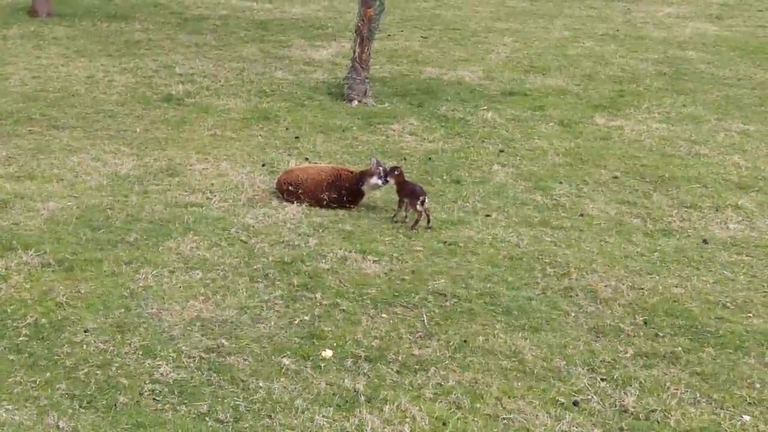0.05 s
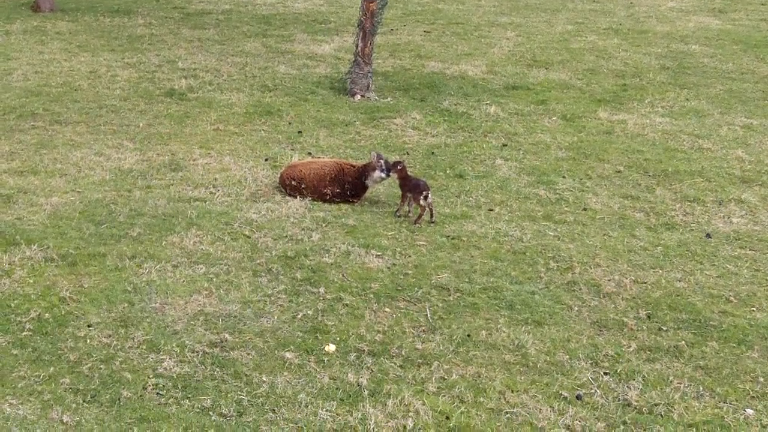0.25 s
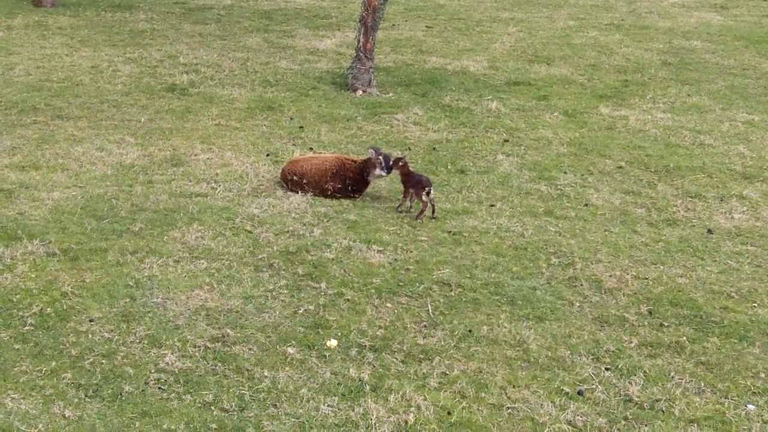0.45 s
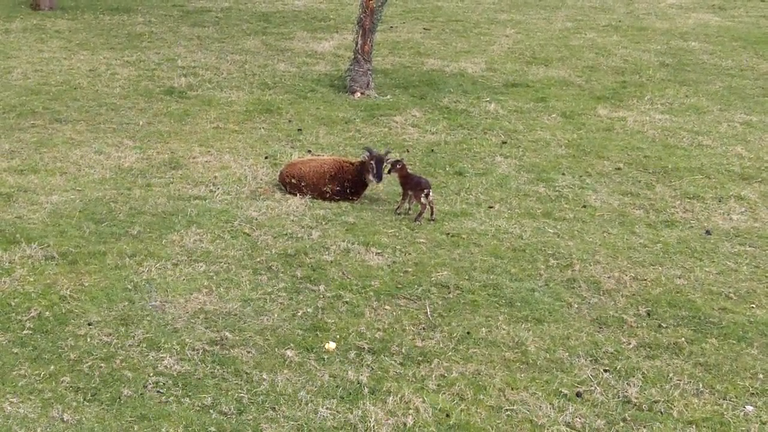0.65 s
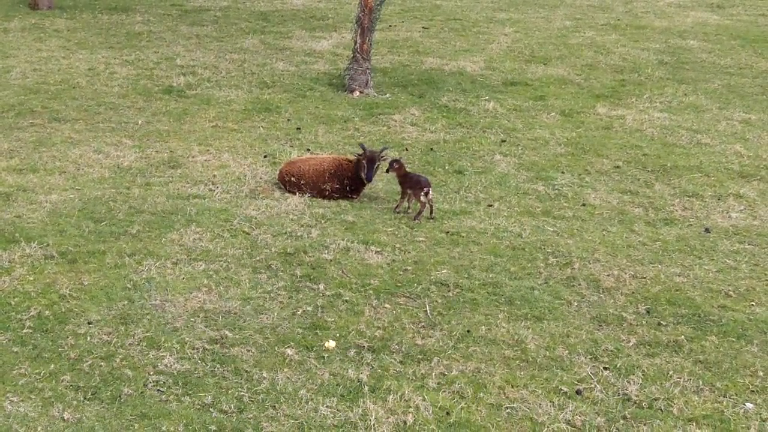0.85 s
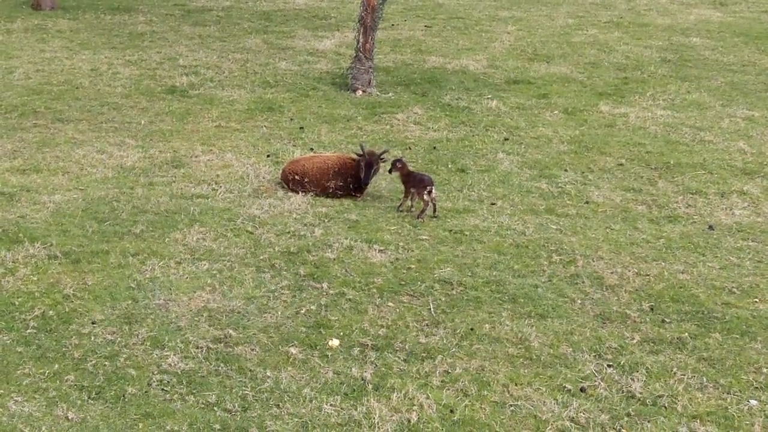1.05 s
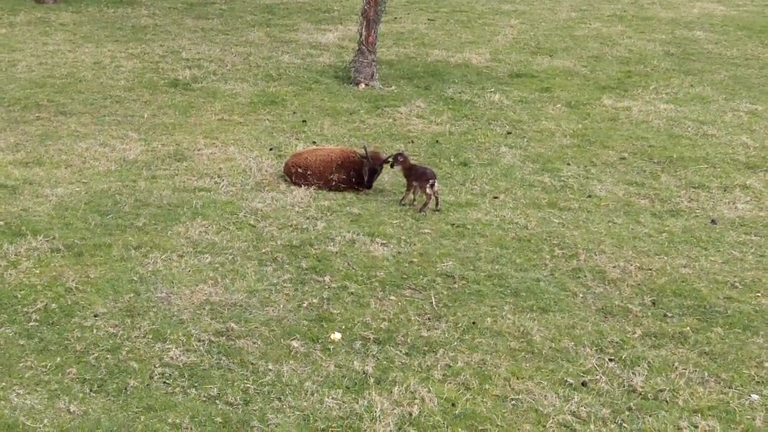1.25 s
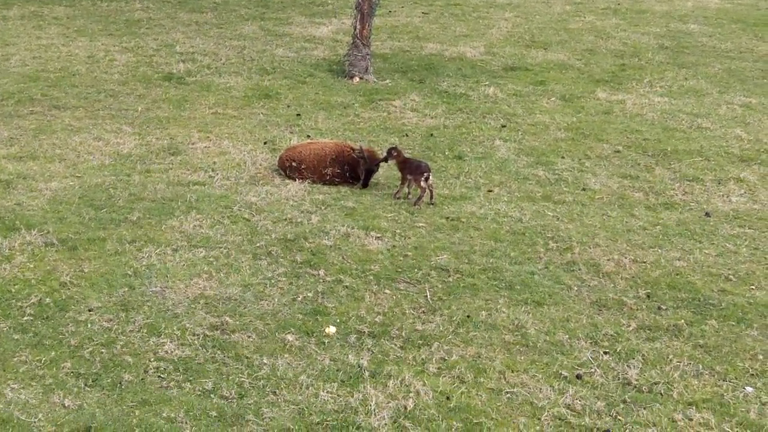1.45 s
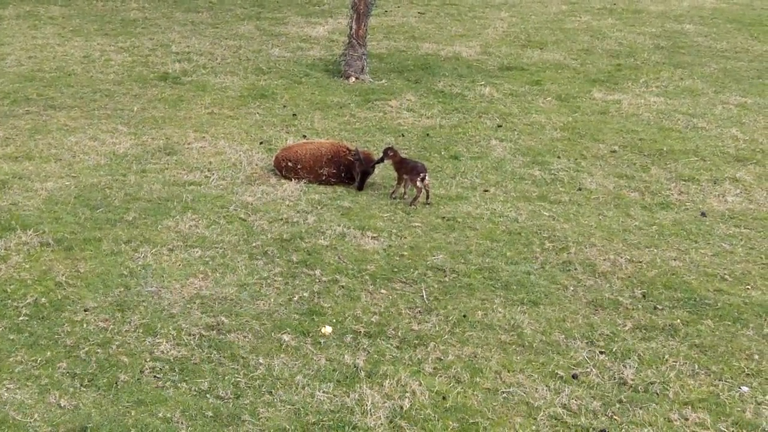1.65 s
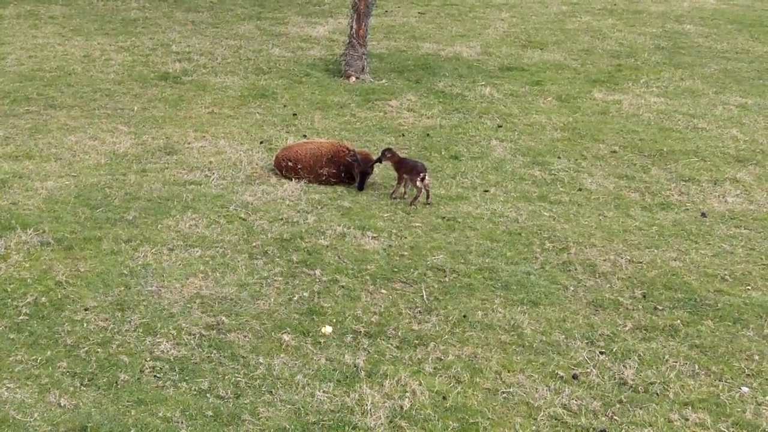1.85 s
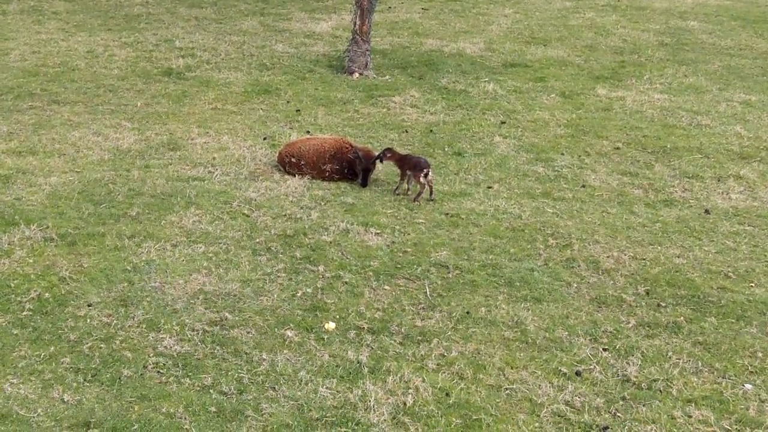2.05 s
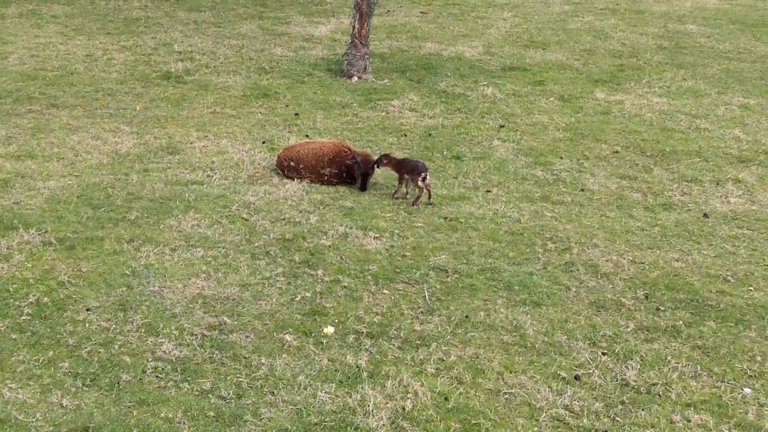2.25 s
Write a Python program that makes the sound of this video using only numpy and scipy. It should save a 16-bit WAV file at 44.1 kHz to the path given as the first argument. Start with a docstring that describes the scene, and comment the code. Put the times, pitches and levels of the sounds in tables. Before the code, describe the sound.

A dog whines close by in three short, thin, falling whimpers over a quiet meadow

```python
"""A dog whines three times close to a camera in a meadow, after the tail of an earlier whine: a near-pure,
mostly falling voice and a thin nasal whistle are two oscillators, with their difference tone between them.
Shaped noise makes the hiss of nose air and grass, a huff, a scuff and the hum of the land; short decaying
bursts make ticks and snaps, slow pulses soft thumps on the microphone. A lamb bleats far off in a few
harmonics, and the camera's electronics sing a steady high tone."""
import sys
import numpy as np
from scipy import signal
from scipy.fft import rfft, irfft, next_fast_len
from scipy.io import wavfile
from scipy.ndimage import uniform_filter1d, map_coordinates

SR = 44100
rng = np.random.default_rng(int(sys.argv[2]) if len(sys.argv) > 2 else 0)


def unload_audio(sound):
    """Save the sound as a 16-bit wav file, at the path given as the first command line argument."""
    columns = np.transpose(np.atleast_2d(sound))
    # keep every value between -1 and 1, then stretch to whole-number steps
    steps = np.round(np.clip(columns, -1, 1) * 32767)
    wavfile.write(sys.argv[1], SR, steps.astype(np.int16))


def volts_from_decibels(level):
    """Turn decibel levels (scalar or array-like) into linear amplitude factors."""
    exponent = np.asarray(level, float) / 20
    return 10 ** exponent


N = 101429
T = np.arange(N) / SR  # time in seconds


def unit(x):
    """Scale to rms 1."""
    return x / np.sqrt(np.mean(x ** 2) + 1e-20)


def along(points, hz):
    """Read (Hz, value) points on a logarithmic frequency axis."""
    f, v = np.transpose(points)
    return np.interp(np.log(hz + 1), np.log(f + 1), v)


def track(tables, column):
    """One column of joined tables, a value per sample."""
    rows = np.concatenate(tables)
    return np.interp(T, rows[:, 0], rows[:, column])


def level(tables, column):
    """Gain from a dB column, fading to silence within 6 ms outside each table."""
    total = np.zeros(N)
    for rows in map(np.asarray, tables):
        inside = np.minimum(T - rows[0, 0], rows[-1, 0] - T)  # seconds from the nearer end
        edge = np.clip(1 + inside / .006, 0, 1)
        gain = volts_from_decibels(np.interp(T, rows[:, 0], rows[:, column]))
        total = np.maximum(total, gain * edge)
    return uniform_filter1d(total, size=90)


def wobble(rate):
    """A smooth random curve, rate knots a second."""
    return map_coordinates(rng.standard_normal(1200), [T * rate])


def filtered(x, response):
    """x times a response given as a function of frequency."""
    m = next_fast_len(N + 8192)
    return irfft(rfft(x, m) * response(np.fft.rfftfreq(m, 1 / SR)), m)[..., :N]


def coloured(x, spectrum):
    """x in the colour of the spectrum, rms 1."""
    return unit(filtered(x, lambda hz: volts_from_decibels(along(spectrum, hz))))


def resonant(x, peaks):
    """x through parallel band resonances of alternating sign, rms 1."""
    def response(f):
        total = 0
        for k, (centre, width, db) in enumerate(peaks):
            damping = 1j * f * width
            total = total + (-1) ** k * volts_from_decibels(db) * damping / (centre * centre - f * f + damping)
        return total
    return unit(filtered(x, response))


def phase(hz):
    """Running phase of a frequency curve."""
    return 2 * np.pi * np.cumsum(hz) / SR


def dog_whine():
    """Voice and whistle oscillate apart; a tone at their difference frequency has its own level."""
    # The voice. Each row: time in seconds, pitch in Hz, level in dB of the 1st, 2nd and 3rd harmonic.
    earlier_tail = [(0, 895, -32, -66, -74), (.012, 760, -51, -69.5, -75.5), (.03, 815, -61, -80.5, -88)]
    whine_rows = [
        [(0.222, 1161, -51.5, -73, -76.5), (0.232, 1137, -41.5, -76.5, -95), (0.24, 1155, -21.5, -48.5, -71),
         (0.248, 1191, -18, -41.5, -56.5), (0.278, 1176, -18, -41, -55), (0.294, 1130, -18.5, -42, -60.5),
         (0.312, 1036, -24, -50.5, -56), (0.32, 973.5, -22, -50, -59), (0.326, 886, -28.5, -53, -81.5),
         (0.33, 814, -32.5, -57, -68), (0.335, 783, -29.5, -58, -70)],
        [(0.337, 768, -27.5, -60, -78.5), (0.345, 749.7, -19, -61, -60), (0.357, 743, -22, -47.5, -71.5),
         (0.367, 744.6, -23, -57, -87.5), (0.405, 698, -27, -57, -68), (0.415, 701.4, -27.5, -61, -80),
         (0.427, 682.4, -29.5, -65, -70), (0.433, 698.5, -31, -82, -86), (0.435, 689, -32.5, -64, -70),
         (0.443, 653.7, -31.5, -52, -72), (0.465, 704.6, -56, -68, -75)],
        [(1.18, 800, -58, -69, -74), (1.19, 822, -32, -67, -74), (1.198, 822, -27, -64, -68),
         (1.21, 815, -27, -55, -70), (1.22, 735, -28.5, -48, -54), (1.232, 699, -31, -61, -54),
         (1.246, 670, -34, -65, -60), (1.26, 651.6, -31.5, -55, -54), (1.28, 620, -36.5, -73, -76),
         (1.284, 614, -44, -46, -76), (1.295, 630, -52, -74, -57)],
        [(1.748, 1265, -50, -60, -78), (1.753, 1276, -33.5, -49, -76), (1.765, 1284, -33, -43, -64),
         (1.792, 1270, -34, -41, -58), (1.803, 1251, -41, -43.5, -58), (1.81, 1244, -60, -46, -55),
         (1.815, 1232, -47, -62, -48), (1.821, 1200, -34, -43, -56), (1.826, 1171, -46.5, -40, -66),
         (1.83, 1155, -31, -40, -66), (1.838, 1135, -26, -43.5, -64), (1.85, 1080, -30, -44, -68),
         (1.857, 1058, -31, -66, -74), (1.869, 985, -23, -58, -66), (1.874, 920, -18, -52, -45),
         (1.88, 880, -17.5, -48, -46), (1.884, 805, -17, -38, -60), (1.889, 763, -21, -39, -53),
         (1.902, 752.5, -22, -38, -52), (1.932, 719, -27, -48, -66), (1.942, 731, -28, -63, -58),
         (1.946, 762.5, -28, -64, -72), (1.958, 750, -29.5, -41.5, -66), (1.982, 734.7, -31, -46, -55.5),
         (2.036, 723, -29.5, -45, -70), (2.044, 697, -30, -43, -65), (2.07, 701, -35.5, -55, -59),
         (2.076, 696, -32.5, -67, -75), (2.092, 665, -46, -78, -76)],
    ]
    # The nasal whistle in three stretches. Each row: time in seconds, frequency in Hz, level in dB.
    whistle_start = [(0.0, 7440, -50.5), (0.026, 7264, -50.5), (0.056, 7165, -42.5), (0.08, 7211, -58),
                     (0.124, 6920, -68.5), (0.132, 6780, -64), (0.198, 6930, -55), (0.24, 6760, -65.5),
                     (0.26, 6790, -78.5)]
    whistle_middle = [(.262, 6800, -77.5), (.31, 6800, -73), (.322, 6750, -57), (0.344, 6330, -66),
                      (.36, 6080, -62.5), (.386, 5770, -68), (.392, 6040, -56), (.4, 6030, -48.5),
                      (.418, 6054, -45), (.44, 6100, -60), (0.459, 6170, -44), (.472, 5850, -67),
                      (.51, 6160, -75)]
    whistle_end = [(0.741, 7000, -78), (0.758, 7000, -60), (.775, 7130, -60), (.795, 7270, -72),
                   (0.811, 7060, -68), (.838, 7025, -63), (.87, 7100, -77), (.95, 7100, -71),
                   (0.991, 7000, -67), (1.04, 6740, -57), (1.052, 6470, -77), (1.075, 6530, -64),
                   (1.111, 6270, -72), (1.151, 6340, -71), (1.18, 6320, -58), (1.22, 6250, -74)]
    # The difference tone, whistle minus voice. Each row: time in seconds, level in dB.
    beat_rows = [(.23, -79), (.245, -63), (.29, -65.5), (.34, -72), (.36, -73), (.41, -70), (.44, -52.5),
                 (.455, -60), (.47, -85)]
    jitter = .001  # random share of the frequency
    shimmer_db, overtone_shimmer_db = .2, 1.3  # overtones flicker more
    fourth_db, octave_db = -11, -35  # 4th harmonic under the 3rd; the whistle's overtone

    voice = [earlier_tail, *whine_rows]
    pipe = [whistle_start, whistle_middle, whistle_end]
    voice_hz = uniform_filter1d(track(voice, column=1), size=200)
    pipe_hz = uniform_filter1d(track(pipe, column=1), size=200)
    low = phase(voice_hz * (1 + jitter * wobble(120)))
    high = phase(pipe_hz * (1 + jitter * wobble(48)))

    first = np.sin(low) * volts_from_decibels(shimmer_db * wobble(90))
    second = np.sin(2 * low) * volts_from_decibels(overtone_shimmer_db * wobble(60))
    upper = np.sin(3 * low) + volts_from_decibels(fourth_db) * np.sin(4 * low)
    upper = upper * volts_from_decibels(overtone_shimmer_db * wobble(60))
    whistle = np.sin(high) + volts_from_decibels(octave_db) * np.sin(2 * high)

    sound = level(voice, column=2) * first
    sound += level(voice, column=3) * second
    sound += level(voice, column=4) * upper
    sound += level(pipe, column=2) * whistle
    sound += level([beat_rows], column=1) * np.sin(high - low)
    return np.sqrt(2) * sound


def echo(x):
    """Trees and walls answer late, as noise in which each frequency dies at its own speed."""
    # Each row: frequency in Hz, time in seconds to fall by 60 dB.
    decay_times = [(500, 1.1), (1300, 1.0), (6000, .4)]
    delay_s = .025
    hz, t, z = signal.stft(rng.standard_normal(SR), SR, nperseg=256)
    decay = volts_from_decibels(-60 * t / along(decay_times, hz)[:, None])
    tail = signal.istft(z * decay, SR, nperseg=256)[1]
    late = np.pad(x, (round(delay_s * SR), 0))
    return signal.fftconvolve(late, tail / np.linalg.norm(tail))[:N]


def surroundings(dog):
    """The meadow answers the dog more or less strongly as it turns."""
    # Each row: time in seconds, level in dB of what is sent to the echo.
    send_rows = [(0, -33.5), (1.0, -38), (1.7, -3), (1.83, -16.5), (1.9, -29.5), (2.3, -9)]
    return echo(level([send_rows], column=1) * dog)


def land_hum():
    """Far hum: coloured noise whose strength varies in patches of time and frequency."""
    # Each row: time in seconds, level in dB.
    hum_levels = [(0, -46.5), (.4, -48), (.8, -50), (1.1, -51), (1.5, -51), (1.9, -48), (2.3, -52)]
    # Each row: frequency in Hz, relative level in dB per Hz.
    hum_colour = [(40, -58), (120, -25), (250, -10.5), (430, -6), (700, -2.5), (1200, -1.5), (1900, -6.5),
                  (2700, -14.5), (5000, -22.5), (8600, -28), (15500, -39), (16000, -60)]
    patch_db = 1.1  # rms depth of the patches
    z = signal.stft(rng.standard_normal(N), nperseg=512)[2]
    field = uniform_filter1d(rng.standard_normal(z.shape), size=6, axis=0)  # across frequency
    field = uniform_filter1d(field, size=12, axis=1)  # across time
    noise = signal.istft(z * volts_from_decibels(patch_db * unit(field)), nperseg=512)[1][:N]
    return level([hum_levels], column=1) * coloured(noise, hum_colour)


def rumble():
    """Low coloured noise under the hum."""
    # Each row: time in seconds, level in dB.
    rumble_levels = [(0, -58.5), (.45, -66), (.9, -67.5), (1.3, -64), (1.7, -71.5), (2.3, -69.5)]
    # Each row: frequency in Hz, relative level in dB per Hz.
    rumble_colour = [(15, -39), (30, -2.5), (90, -6.5), (200, -2.5), (310, -6.5), (365, 11.5), (430, -33.5),
                     (700, -37)]
    return level([rumble_levels], column=1) * coloured(rng.standard_normal(N), rumble_colour)


def camera_tone():
    """The electronics' steady tone, whose sign flips with every picture field."""
    tone_hz, tone_db = 7867.2, -56.5
    flips_per_s, first_flip_s, flip_s = 59.94, .0058, .00059  # flip_s: time constant of one flip
    swing = np.sin(np.pi * flips_per_s * (T - first_flip_s))
    sign = np.tanh(swing / (np.pi * flips_per_s * flip_s))
    return np.sqrt(2) * volts_from_decibels(tone_db) * sign * np.sin(2 * np.pi * tone_hz * T)


def side_hiss():
    """A faint steady coloured hiss, for use in opposite sign left and right."""
    # Each row: frequency in Hz, relative level in dB per Hz.
    side_colour = [(100, -51.5), (300, -11), (1000, -13), (2500, -11), (6000, -12.5), (10000, -16.5),
                   (15500, -12)]
    return volts_from_decibels(-72.5) * coloured(rng.standard_normal(N), side_colour)


def rustle():
    """Nose air and grass: smooth noise with random crackling grains, in one shared colour."""
    # One list of rows. Each row: time in seconds, level in dB before the lift below.
    hiss_rows = [
        [(.1, -88.5), (.16, -74), (.22, -77), (.43, -86), (.6, -86), (.67, -70), (.76, -84), (.79, -60),
         (.84, -66), (.88, -68.5), (.97, -70.5), (1.04, -63), (1.08, -69.5), (1.18, -73), (1.24, -60),
         (1.295, -59), (1.31, -80), (1.4, -67.5), (1.5, -65.5), (1.6, -69.5), (1.66, -62), (1.84, -58),
         (2.0, -59), (2.12, -61.5), (2.18, -69)],
    ]
    # Each row: frequency in Hz, relative level in dB per Hz.
    hiss_colour = [(1760, -21), (3000, -2), (3170, -4), (4060, -3), (7280, -4), (8070, -8), (8580, -8.5),
                   (14700, -21.5), (15500, -32.5)]
    lift_db, flutter_db = 5, 1.4
    grains_per_s, grain_db, grain_spread_db = 900, -5, 3  # grain_db: grains against the smooth noise
    chance, size = rng.random((2, N))
    grains = (chance < grains_per_s / SR) * rng.standard_normal(N)
    grains = grains * volts_from_decibels(-grain_spread_db * np.log(size + 0.00091))  # a few grains stand far out
    mix = rng.standard_normal(N) + volts_from_decibels(grain_db) * unit(grains)
    flutter = volts_from_decibels(lift_db + flutter_db * wobble(70))
    return flutter * level(hiss_rows, column=1) * coloured(mix, hiss_colour)


def grass_snaps():
    """Duller snaps: a very short contact rings the resonances of a stalk."""
    # Each row: start in seconds, peak level in dB.
    snap_rows = [(.163, -45), (.78, -44), (.803, -40), (1.322, -42), (1.469, -45), (1.484, -38),
                 (1.527, -44), (1.561, -37), (1.685, -39), (1.715, -35)]
    # Each row: resonance in Hz, width in Hz, relative level in dB.
    stalk = [(850, 250, -2), (2450, 350, 0), (3500, 400, -2)]
    contact_s = .0001  # decay constant of the contact
    snap = resonant(np.exp(-T / contact_s), stalk)[:SR // 20]
    snap = snap / np.abs(snap).max()
    sound = np.zeros(N)
    for s, db in snap_rows:
        sound[round(s * SR):][:len(snap)] += volts_from_decibels(db) * snap
    return sound


def dry_ticks():
    """Dry ticks in the grass: a few cycles of a high ring, and a crack of noise."""
    # Each row: start in seconds, level in dB before the offsets below, ring frequency in Hz.
    tick_rows = [(0.1634, -48, 9600), (0.19, -49.5, 9870), (0.4324, -41, 10040), (0.6473, -48, 9270),
                 (0.67, -47, 10260), (.789, -51, 11500), (.838, -50, 6430), (0.803, -45.5, 10300),
                 (0.8695, -49.5, 12000), (0.8955, -39.5, 5800), (1.0005, -48, 9900), (1.2117, -43.5, 11550),
                 (1.282, -43.5, 8660), (1.322, -49, 9164), (1.4843, -45, 11170), (1.5612, -45.5, 10370),
                 (1.5695, -43.5, 11000), (1.58, -49, 9500), (1.8212, -42.5, 9650)]
    # Each row: frequency in Hz, filter gain in dB for the cracks.
    crack_colour = [(3500, -24), (5500, 0), (10000, -3), (15500, -13)]
    ring_db, ring_t60_s, attack_s = -3, .006, .0004
    crack_db, crack_t60_s = 10, .0015
    rings, cracks, t = np.zeros(N), np.zeros(N), np.arange(SR // 20) / SR
    for s, db, hz in tick_rows:
        start = round(s * SR)
        envelope = volts_from_decibels(db + ring_db - 60 * t / ring_t60_s) * (1 - np.exp(-t / attack_s))
        rings[start:][:len(t)] += envelope * np.sin(2 * np.pi * hz * t)
        decay = volts_from_decibels(db + crack_db - 60 * t[:40] / crack_t60_s)
        cracks[start:][:40] += decay * rng.standard_normal(size=40)
    return rings + filtered(cracks, lambda hz: volts_from_decibels(along(crack_colour, hz)))


def microphone_thumps():
    """Soft low pushes on the microphone: each swings out and back, and rebounds once."""
    # Each row: start in seconds, level in dB before the filter, time constant of the push in seconds.
    thump_rows = [(.503, -46, .001), (.718, -54, .0024), (.778, -59, .002), (.838, -55, .0015),
                  (1.036, -56, .002), (1.105, -57, .003), (1.156, -58, .0022), (1.246, -56, .003),
                  (1.305, -47, .0007), (1.462, -57, .002), (1.609, -61, .0014), (1.826, -58, .0018)]
    # What the microphone passes of a push. Each row: frequency in Hz, gain in dB.
    push_response = [(15, -34.5), (55, -2.5), (220, 8), (500, -13)]
    rebound_s, rebound_db = .009, -3
    pushes, t = np.zeros(N), np.arange(SR // 20) / SR
    for s, db, length in thump_rows:
        u = t / length
        push = np.e * u * (2 - u) * np.exp(-u)
        for late, loss_db in (0, 0), (rebound_s, rebound_db):
            pushes[round((s + late) * SR):][:len(t)] += volts_from_decibels(db + loss_db) * push
    return filtered(pushes, lambda hz: volts_from_decibels(along(push_response, hz)))


def grass_scuff():
    """One scuff in the grass: fluttering noise in a single band."""
    # Each row: time in seconds, level in dB.
    scuff_rows = [(.775, -70), (.781, -55), (.788, -63), (.8, -51), (.808, -65), (.82, -57), (.84, -60),
                  (.858, -72)]
    # Each row: centre in Hz, width in Hz, relative level in dB.
    scuff_band = [(4100, 1300, 0)]
    flutter = volts_from_decibels(3.5 * wobble(250))
    return level([scuff_rows], column=1) * flutter * resonant(rng.standard_normal(N), scuff_band)


def faint_notes():
    """Faint notes and peeps: sines with slightly unsteady pitch."""
    # Each row: start in seconds, end in seconds, frequency in Hz, level in dB.
    note_rows = [(2.115, 2.19, 1868, -59), (2.21, 2.27, 1906, -63), (2.092, 2.098, 5600, -58),
                 (1.64, 1.665, 7350, -64)]
    notes = np.zeros(N)
    for start, end, hz, db in note_rows:
        sine = np.sin(phase(hz * (1 + 0.0026 * wobble(12))))
        notes += level([[(start, db), (end, db)]], column=1) * sine
    return np.sqrt(2) * notes


def dog_huff():
    """A huff before the last whine: fluttering breath noise through the muzzle's resonances."""
    # Each row: time in seconds, level in dB.
    huff_rows = [(1.672, -64), (1.684, -48), (1.7, -47), (1.706, -53), (1.716, -42.5), (1.733, -46),
                 (1.739, -56), (1.77, -62)]
    # Each row: resonance in Hz, width in Hz, relative level in dB.
    muzzle = [(900, 300, -12), (1600, 250, -6), (2600, 330, 1), (3500, 900, -14)]
    flutter = volts_from_decibels(3.5 * wobble(180))
    return level([huff_rows], column=1) * flutter * resonant(rng.standard_normal(N), muzzle)


def lamb():
    """A faint bleat across the meadow: a few harmonics, each flickering by itself."""
    # Each row: time in seconds, pitch in Hz, level in dB.
    bleat_rows = [(2.09, 498, -70), (2.12, 497, -62), (2.2, 490, -63), (2.3, 481, -67)]
    # Each row: multiple of the pitch, relative level in dB.
    harmonics = [(1, 0), (2, 1), (3, -2), (5, -3), (6, -4)]
    turn = phase(track([bleat_rows], column=1) * (1 + 0.0034 * wobble(20)))
    tone = sum(volts_from_decibels(db + 1.1 * wobble(26.7)) * np.sin(k * turn) for k, db in harmonics)
    return np.sqrt(2) * level([bleat_rows], column=2) * tone


def scene():
    """Nearly mono: the dog stands a little to the right, and a faint hiss differs left and right."""
    dog = dog_whine() + dog_huff()
    lean_db = 0.35  # taken from the left, given to the right
    middle = surroundings(dog) + land_hum() + rumble() + camera_tone()
    middle += rustle() + grass_snaps() + dry_ticks() + microphone_thumps() + grass_scuff()
    middle += faint_notes() + lamb()
    side = side_hiss()
    return dog * volts_from_decibels([[-lean_db], [lean_db]]) + middle + np.array([side, -side])


def band_limit(x):
    """A steep low-pass at the top of the band."""
    return signal.sosfilt(signal.butter(12, 15670, fs=SR, output="sos"), x)


def record(dry):
    """Nothing above 15.6 kHz is kept."""
    mix = filtered(dry, lambda hz: hz < 15600)
    return band_limit(mix)


dry = scene()
out = record(dry)
unload_audio(out)
```